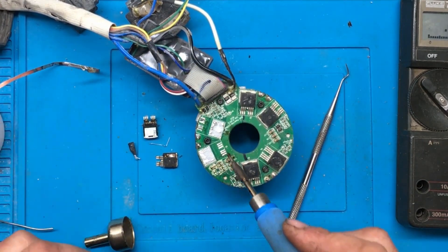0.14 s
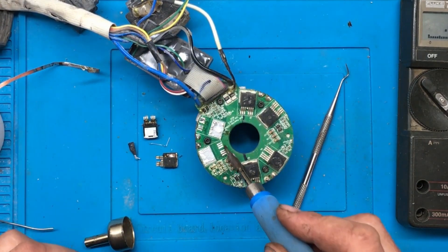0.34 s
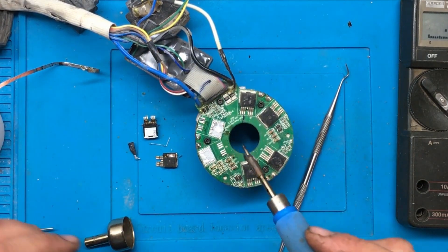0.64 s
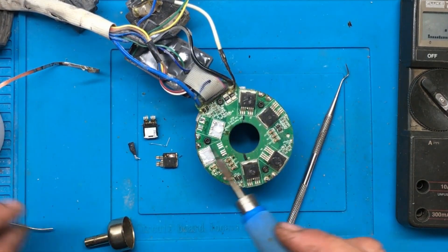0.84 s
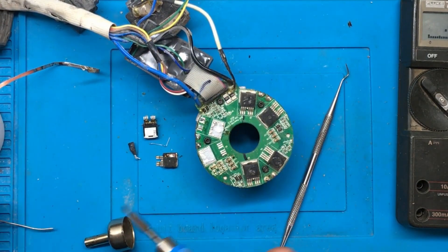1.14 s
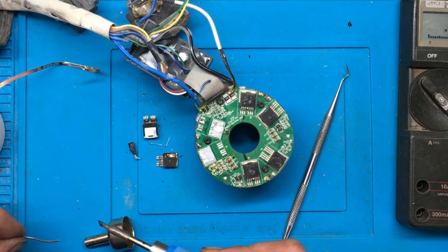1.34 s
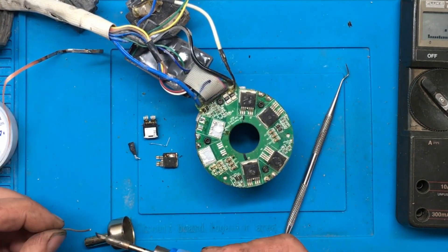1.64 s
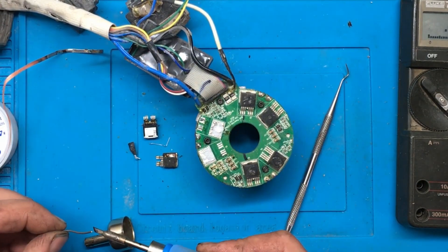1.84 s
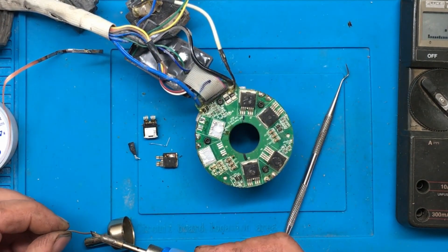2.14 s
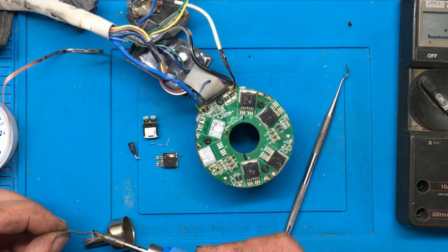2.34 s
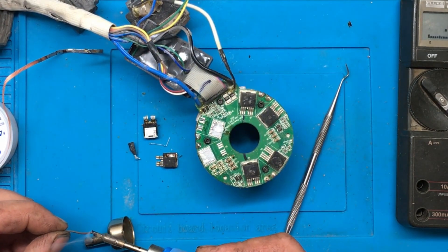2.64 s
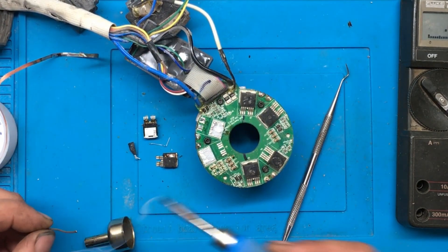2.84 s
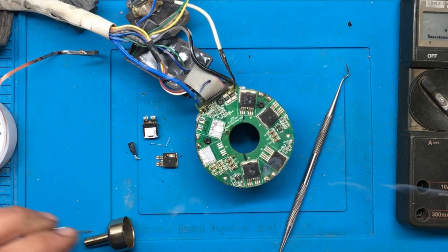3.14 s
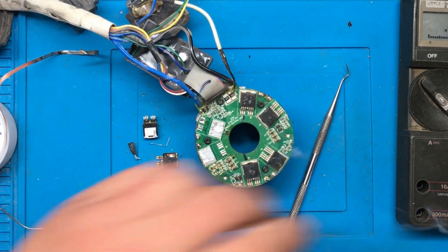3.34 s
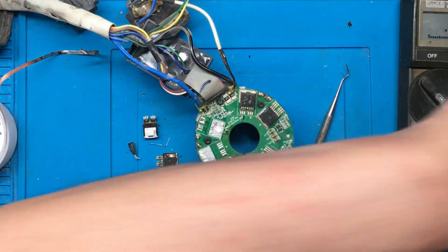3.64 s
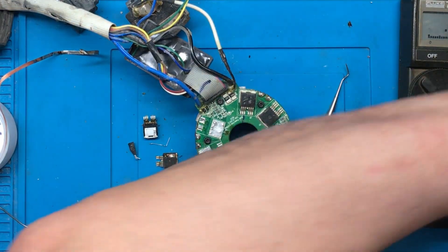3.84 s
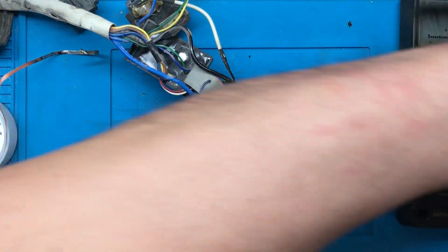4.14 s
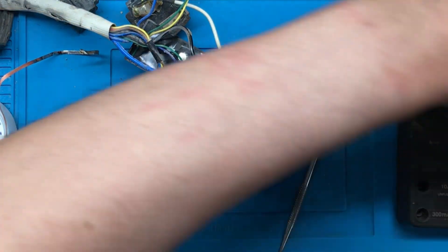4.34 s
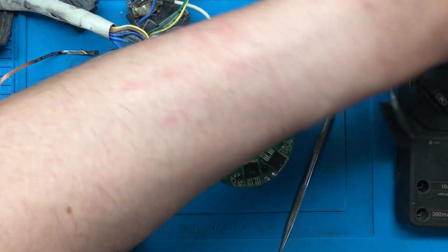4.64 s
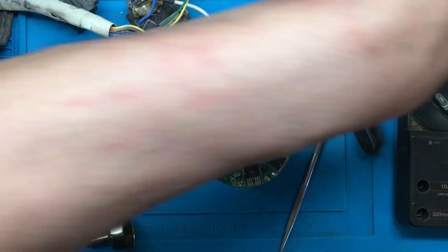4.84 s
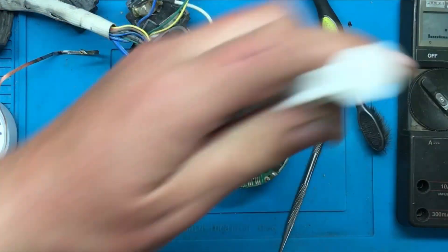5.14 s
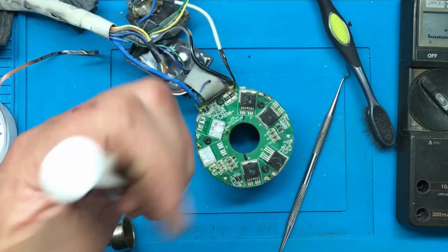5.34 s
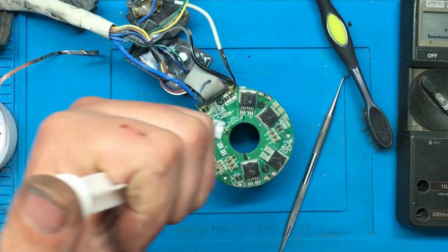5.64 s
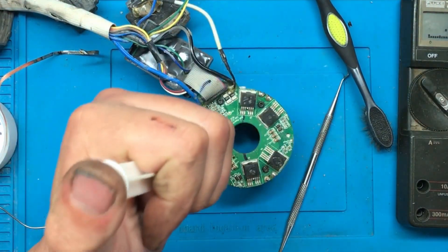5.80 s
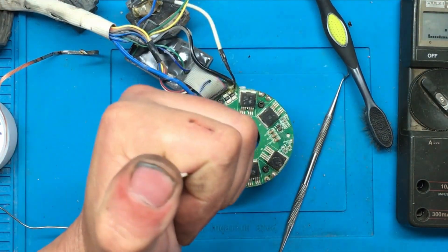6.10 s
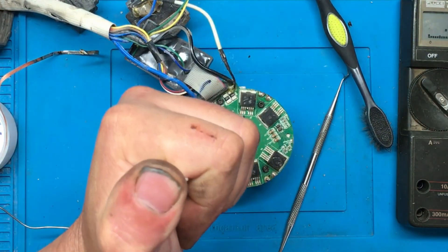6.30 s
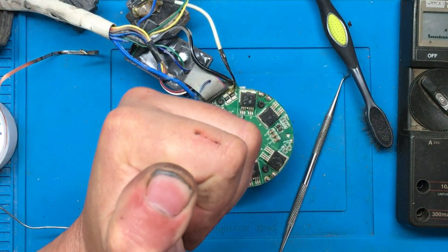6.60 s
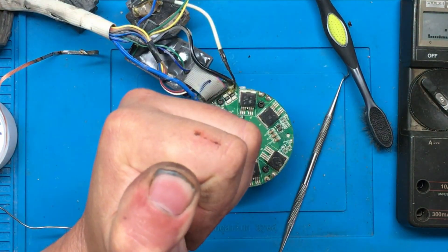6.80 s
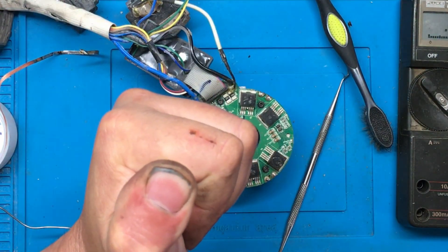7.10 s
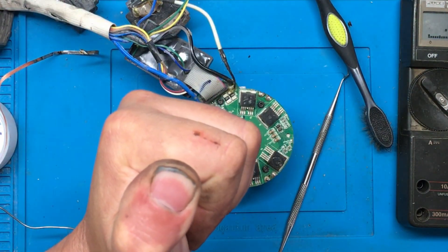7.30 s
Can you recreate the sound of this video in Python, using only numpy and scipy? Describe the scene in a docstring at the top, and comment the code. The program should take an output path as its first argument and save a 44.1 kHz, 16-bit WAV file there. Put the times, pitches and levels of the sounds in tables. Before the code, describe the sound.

Close to the microphone in a small room, soft metallic taps of a soldering iron on a cup are followed by a ringing click as it meets its stand. Tools then knock and rattle on a workbench, with loud plastic clacks and low bumps of a hand. Dull thuds and a sleeve rustle mark a syringe being lifted. Its plunger ticks very softly at the end, over low room noise and a faint fan.

```python
"""A soldering iron taps a metal cup, close under the microphone on a rubber-matted bench in a small room.
It clicks into its stand; tools clatter, plastic clacks, and a syringe is picked up with a thud.
Each blow is a short contact crack, a knock of the bench top and a thump of its frame; a dropped tool
bounces. Hands and a sleeve rustle in separate strokes, and at the end the syringe plunger creeps and
clicks over quiet room noise and a faint fan."""
import sys
import numpy as np
from scipy import signal
from scipy.fft import rfft, irfft
from scipy.io import wavfile
from scipy.ndimage import uniform_filter1d

SR = 44100
rng = np.random.default_rng(int(sys.argv[2]) if len(sys.argv) > 2 else 0)


def persist_wave(psi):
    """Save psi, clipped to +-1, as 16-bit WAV."""
    counts = np.round(np.clip(psi, -1, 1) * 32767).astype(np.int16)
    wavfile.write(sys.argv[1], SR, np.atleast_2d(counts).T)


N = 328986


def amp(db):
    """Decibels to gain."""
    return 10 ** (np.asarray(db) / 20)

def unit(x):
    """Scales to an rms of 1."""
    return x / np.sqrt(np.mean(x ** 2) + 1e-20)

def at_level(sound, db, count):
    """Sets the rms of the first count samples."""
    return amp(db) * sound / np.sqrt(np.mean(sound[:count] ** 2) + 1e-20)

def seconds(count):
    """A time axis of count samples."""
    return np.arange(count) / SR

def add(mix, start, sound):
    """Adds a sound to the mix, start seconds in."""
    part = mix[round(start * SR):][:len(sound)]
    part += sound[:len(part)]

def read(points, hz):
    """Reads a curve on a log-frequency axis."""
    point_hz, value = np.transpose(points)
    return np.interp(np.log(hz + 1), np.log(point_hz + 1), value)

def coloured(x, tone):
    """Filters a scene-long signal by a tone curve, to an rms of 1."""
    gain = amp(read(tone, np.fft.rfftfreq(N, 1 / SR)))
    return unit(irfft(rfft(x) * gain, N))

def causal(gain_db):
    """Spectrum of the filter with this gain that rings only after its input."""
    log_gain = np.log(amp(np.concatenate([gain_db, gain_db[-2:0:-1]])))
    return np.exp(np.conj(signal.hilbert(log_gain)))[:len(gain_db)]


# Tools landing right under the microphone.
# Each row: start in seconds, crack level in dB, bench knock level in dB, treble tilt in dB per octave.
TOOL_HITS = [(3.8427, -37, -45.5, 1.5), (3.859, -21.5, -30.5, -1.06), (4.0155, -36, -54.5, 3.5),
             (4.0385, -42.5, -51, -5), (4.0735, -46, -58.5, -7.5), (4.091, -43, -50.5, 0),
             (4.202, -46, -56, -3), (4.227, -50, -56, -.5), (4.247, -43, -61, -0.5), (4.275, -41, -54, 6),
             (4.4884, -30, -46, -2), (4.7523, -33, -41, -2.5), (4.8553, -18, -33, 0), (4.9535, -37, -43, 2)]
# The colour of their crack. Each row: frequency in Hz, gain in dB.
TOOL_TONE = [(300, -31), (900, -0.5), (1300, -4.5), (2200, -3), (3300, -1.5), (5000, -6), (6600, -4),
             (9000, -0.5), (11000, -3), (16000, -10)]
# Their ring. Each row: frequency in Hz, level above the crack in dB, t60 in seconds.
TOOL_MODES = [(695.4, 5, 0.2), (976, 5.9, 0.14), (1140.4, 10, 0.1), (2401, 3, 0.072), (3205, 8.8, 0.08),
              (4257, 6.8, 0.078), (4400, 3, .12), (5960, 5, .13), (6620, 7.9, 0.039), (8460, 4, 0.18),
              (8850, 4.8, 0.065)]

def tool_clatter():
    """Tools strike the bench and ring; those that land hard bounce twice."""
    return blows(TOOL_HITS, TOOL_TONE, TOOL_MODES,
                 contact_ms=2.3, frame_db=3.5, wet_db=-11, knock_wet_db=-8.5, hard_bounces=2)

# Plastic set down among the tools, close up.
# Each row: start in seconds, crack level in dB, bench knock level in dB, treble tilt in dB per octave.
PLASTIC_HITS = [(4.553, -18.5, -30, -4.5), (4.5583, -14.5, -32.5, 2.5), (4.6455, -35, -49.5, -26),
                (4.6655, -16.5, -44, .5), (4.9232, -34, -38.5, -2)]
# The colour of its crack. Each row: frequency in Hz, gain in dB.
PLASTIC_TONE = [(300, -18.5), (900, -5), (1600, 0), (2200, 1), (3000, -2), (4200, -5), (5500, -12.5),
                (8000, -15), (11000, -20.5), (16000, -33.5)]
# Its ring. Each row: frequency in Hz, level above the crack in dB, t60 in seconds.
PLASTIC_MODES = [(1403, 2.5, 0.091), (1545, 4, 0.076), (1714, 13, 0.062), (1840, 0.5, 0.088),
                 (2690, 1.5, 0.12), (2940, 3, 0.12), (3140, 4, .13)]

def plastic_clacks():
    """Hard plastic cracks and rings briefly in the midrange."""
    return blows(PLASTIC_HITS, PLASTIC_TONE, PLASTIC_MODES,
                 contact_ms=1.7, frame_db=10.5, wet_db=-14, knock_wet_db=-19)

# The metal cup on the bench.
# Each row: start in seconds, crack level in dB, bench knock level in dB, treble tilt in dB per octave.
CUP_HITS = [(1.3015, -44.5, -56.5, -2.5), (1.3695, -43.5, -60, -3.5), (1.418, -42, -79, -7),
            (1.4303, -35, -61, 6), (1.562, -51.5, -78, 4.5)]
# The colour of its crack. Each row: frequency in Hz, gain in dB.
CUP_TONE = [(300, 8), (850, -24), (1250, 2.5), (1650, 3.5), (2300, -2.5), (3400, -2), (5500, -8.5),
            (9500, -10), (12500, -23), (16000, -26)]
# Its ring. Each row: frequency in Hz, level above the crack in dB, t60 in seconds.
CUP_MODES = [(1145, 2, 0.11), (1585, -4, 0.14), (1717, -7, .14), (3340, 6, 0.093), (4400, 6, 0.053),
             (9100, -3, .1)]

def cup_taps():
    """Light taps of the soldering iron ring the cup."""
    return blows(CUP_HITS, CUP_TONE, CUP_MODES,
                 contact_ms=2.3, frame_db=6.5, wet_db=-9.5, knock_wet_db=-14)

# The iron meeting its stand.
# Each row: start in seconds, crack level in dB, bench knock level in dB, treble tilt in dB per octave.
IRON_HITS = [(2.9268, -35.5, -57.5, -.5), (3.064, -50, -65, .5), (3.0867, -25, -50, -.4)]
# The colour of its crack. Each row: frequency in Hz, gain in dB.
IRON_TONE = [(300, -52), (850, -18.5), (1350, 2.5), (2100, -10), (3000, -3.5), (4000, -3), (5700, -0.5),
             (7500, -9), (11000, -15), (16000, -27)]
# Its ring. Each row: frequency in Hz, level above the crack in dB, t60 in seconds.
IRON_MODES = [(1190, -2, .12), (1322, 2, .09), (1412, 1, .14), (1560, -2, .1), (1705, 0, .12),
              (3000, 3, .08), (3840, 2, .08), (4750, 0, .09), (5275, 2, .1), (5890, 4, .06), (6065, 2, .12),
              (6400, 1, .16)]

def iron_clicks():
    """The iron seats with short contacts that ring many metal modes."""
    return blows(IRON_HITS, IRON_TONE, IRON_MODES,
                 contact_ms=1.54, frame_db=12, wet_db=-13.5, knock_wet_db=-8)

# The syringe taken off the mat.
# Each row: start in seconds, crack level in dB, bench knock level in dB, treble tilt in dB per octave.
SYRINGE_HITS = [(5.2442, -22.5, -27, -3.5), (5.3185, -32, -28.5, -5.5), (5.3345, -31.5, -33, -5),
                (5.362, -43, -33.5, -5)]
# The colour of its crack. Each row: frequency in Hz, gain in dB.
SYRINGE_TONE = [(300, -58.5), (800, -2.5), (1300, -26), (1900, -3.5), (3100, -3.5), (4200, -13),
                (5500, -19), (8000, -18), (11000, -15), (16000, -22)]
# Its ring. Each row: frequency in Hz, level above the crack in dB, t60 in seconds.
SYRINGE_MODES = [(540, 29, 0.093), (820, -27, 0.12), (1132, -1, .12), (1896, 10, .1), (2580, 2, 0.28),
                 (3180, -1, 0.076)]

def syringe_thuds():
    """Picking up the syringe bumps the bench with a few dull blows."""
    return blows(SYRINGE_HITS, SYRINGE_TONE, SYRINGE_MODES,
                 contact_ms=2.4, frame_db=5.5, wet_db=-15, knock_wet_db=-15.5)


HARD_DB, CONTACT_DOUBLES_DB = -18, 56.5  # a hard blow, and the drop in level that doubles contact time
BOUNCE_ABOVE_DB, BOUNCE_GAP_S, BOUNCE_SHRINK = -26, 0.0093, 0.64
BOUNCE_LOSS_DB, BOUNCE_FADE_DB, BOUNCE_DULL_DB_PER_OCT = 6.5, 7.5, 1.5

def blows(hits, tone, modes, contact_ms, frame_db, wet_db, knock_wet_db, hard_bounces=0):
    """Each blow cracks and rings the object; landing flat, it knocks the top and thumps the frame."""
    cracks, knocks, thumps = np.zeros((3, N))
    for start, crack_db, knock_db, tilt_db in hits:
        softness = 2 ** ((HARD_DB - crack_db) / CONTACT_DOUBLES_DB)
        add(cracks, start, crack(tone, crack_db, tilt_db, contact_ms * softness))
        bounces = hard_bounces if crack_db > BOUNCE_ABOVE_DB else 0
        landing = start + BOUNCE_GAP_S if bounces else start
        add(knocks, landing, knock(knock_db))
        add(thumps, landing, thump(knock_db + frame_db))
        for k in range(bounces):  # each sooner, weaker and duller
            start += BOUNCE_GAP_S * BOUNCE_SHRINK ** k
            bounce_db = crack_db - BOUNCE_LOSS_DB - BOUNCE_FADE_DB * k
            bounce_tilt_db = tilt_db - BOUNCE_DULL_DB_PER_OCT * k
            add(cracks, start, crack(tone, bounce_db, bounce_tilt_db, contact_ms=6.2))
    return room(resonate(cracks, modes), wet_db) + room(knocks, knock_wet_db, echoes=[]) + thumps

def crack(tone, db, tilt_db, contact_ms, rise_ms=0.3):
    """One sharp contact, then a dying chatter of the touching surfaces, in the object's colour."""
    t, hz = seconds(count=2048), np.fft.rfftfreq(2048, 1 / SR)
    ms = t * 1000
    chatter = rng.standard_normal(len(t)) * np.exp(-ms / max(contact_ms, 0.2))
    chatter *= 1 - np.exp(-ms / rise_ms)
    chatter[0] += 1.5  # the first contact
    spectrum = rfft(chatter)
    spectrum /= np.sqrt(uniform_filter1d(abs(spectrum) ** 2, size=35))  # no colour of its own
    treble_octaves = np.log2(np.maximum(hz, 1000) / 1000)
    low_cut_db = -20 * np.log10(1 + (220 / (hz + 10)) ** 2)
    sound = irfft(spectrum * causal(read(tone, hz) + tilt_db * treble_octaves + low_cut_db))
    fade = np.cos(np.pi / 2 * t / t[-1]) ** 2
    return at_level(sound * fade, db, count=265)

def resonate(x, modes):
    """Contacts set an object's modes ringing."""
    t = seconds(count=14000)
    tail = np.zeros(len(t))
    for hz, db, t60 in modes:
        unity_peak = 2 * np.log(1000) / (t60 * SR)
        tail += unity_peak * amp(db - 60 * t / t60) * np.cos(2 * np.pi * hz * t)
    return x + signal.oaconvolve(x, tail)[:N]

def ring(modes, t, scatter_db=0):
    """Dying modes; where the blow lands scatters their strengths and signs."""
    hz, db, t60 = np.transpose(modes)[:, :, None]
    weight = amp(db + scatter_db * rng.standard_normal(db.shape)) * rng.choice([-1, 1], db.shape)
    return (weight * np.sin(2 * np.pi * hz * t) * amp(-60 * t / t60)).sum(0)

# The bench top below the microphone. Each row: frequency in Hz, relative level in dB, t60 in seconds.
BENCH_MODES = [(267.6, 1.5, 0.2), (281.8, -14, 0.33), (366, -1.5, 0.29), (404.6, -9.5, 0.28),
               (440.5, 4, 0.099), (469, -6, 0.041), (576, -9, 0.34), (622.2, 2, 0.068), (686, -6.5, 0.26),
               (854, 0, 0.053), (936, -11, 0.082)]

def knock(db, rise_s=0.00067, loose_gain=0.8, loose_t60_s=0.17):
    """The bench top rings in its modes, and loose things on it shudder."""
    t = seconds(count=16000)
    band = signal.butter(2, [260, 1000], "band", fs=SR, output="sos")
    shudder = signal.sosfilt(band, rng.standard_normal(len(t))) * amp(-60 * t / loose_t60_s)
    sound = unit(ring(BENCH_MODES, t, scatter_db=2)) + loose_gain * unit(shudder)
    return at_level(sound * (1 - np.exp(-t / rise_s)), db, count=1100)

def thump(db, hz=152, t60_s=0.16, rise_s=0.0032, wander=0.05,
          sway_ratio=0.57, sway_db=-14.5, sway_t60_s=0.18):
    """The heavy bench frame swings a little unevenly in its main mode, with a weaker, slower sway."""
    t = seconds(count=16000)
    drift = unit(uniform_filter1d(rng.standard_normal(len(t)), size=300))
    phase = 2 * np.pi * np.cumsum(hz * (1 + wander * drift)) / SR
    swing = amp(-60 * t / t60_s) * np.sin(phase)
    sway = amp(sway_db - 60 * t / sway_t60_s) * np.sin(sway_ratio * phase)
    return amp(db) * (swing + sway) * (1 - np.exp(-t / rise_s))

# A hand or forearm coming to rest on the bench. Each row: start in seconds, level in dB, pitch in Hz.
HAND_LANDINGS = [(1.342, -41, 128), (1.375, -40.5, 127), (3.844, -34, 150), (4.03, -36, 147),
                 (4.094, -34.5, 147), (4.682, -27.5, 139), (4.762, -27.5, 142), (5.283, -30, 148),
                 (5.381, -28.5, 149), (7.328, -37.5, 91)]

def hand_landings():
    """Soft landings move only the frame of the bench."""
    out = np.zeros(N)
    for start, db, hz in HAND_LANDINGS:
        add(out, start, thump(db, hz))
    return out

# Things juddering over the mat. Each row: start and end in seconds, relative level in dB, centre in Hz.
DRAGS = [(1.435, 1.608, -60, 350), (4.63, 4.68, -57, 298), (4.713, 4.794, -35, 275),
         (4.919, 4.964, -41, 363), (5.251, 5.324, -34, 524), (5.334, 5.393, -34, 520)]

def dragging(slips_per_s=300, band_ratio=1.2):
    """Things pushed over the rubber catch and slip, and the bench top rumbles with the judder."""
    out, t = np.zeros(N), seconds(count=12000)
    for start, end, db, hz in DRAGS:
        slips = (rng.random(len(t)) < slips_per_s / SR) * rng.uniform(0.19, 1, len(t))
        band = signal.butter(2, [hz / band_ratio, hz * band_ratio], "band", fs=SR, output="sos")
        judder = signal.sosfilt(band, slips * (t < end - start))
        add(out, start, at_level(judder, db, count=round((end - start) * SR)))
    return room(resonate(out, BENCH_MODES), wet_db=-5, echoes=[]) / 2

def stroke(start, release, db, rise_s, fade_db_per_s):
    """Gain of one movement: it rises from start and fades from release, both in seconds."""
    t = seconds(N)
    rise = np.clip((t - start) / rise_s, 0, 1)
    return rise * amp(db - fade_db_per_s * np.maximum(t - release, 0))

def slip_train(per_s, spread_db, max_spreads=3, both_ways=True):
    """Surfaces catch and let go in random impulses of uneven size."""
    slips = rng.random(N) < per_s / SR
    signs = rng.choice([-1, 1], N) if both_ways else 1
    return slips * signs * amp(spread_db * np.minimum(rng.exponential(1, N), max_spreads))

# Tools and fingers rubbing the mat, close up. Each row: start and release in seconds, level in dB.
RUBS = [(1.31, 1.34, -59.5), (1.476, 1.544, -55.5), (3.645, 3.67, -64), (3.94, 4.31, -57.5),
        (4.388, 4.47, -61.5), (4.476, 4.697, -46), (4.819, 4.97, -46.5), (5.012, 5.322, -53),
        (5.44, 5.575, -59.5)]
# The colour of the friction. Each row: frequency in Hz, gain in dB.
RUB_TONE = [(80, 3), (150, 17.5), (300, 9), (600, -2), (1200, 0), (2200, -3), (3500, -1), (5500, -7),
            (9000, -4), (13000, -9.5), (16000, -12.5)]

def rubbing(hiss_gain=0.7):
    """Friction: a spray of tiny slips over a smooth hiss."""
    slips = unit(slip_train(per_s=700, spread_db=3.5, max_spreads=4))
    friction = coloured(slips + hiss_gain * rng.standard_normal(N), RUB_TONE)
    pressure = np.max([stroke(*row, rise_s=0.025, fade_db_per_s=199) for row in RUBS], axis=0)
    return room(friction * pressure, wet_db=-7)

# A sleeve near the microphone. Each row: start and length in seconds, level in dB, hiss peak in Hz.
SLEEVE_STROKES = [(5.128, 0.14, -43.5, 8960), (5.364, 0.092, -42, 8460), (5.473, 0.13, -56, 9100)]
# The colour of its hiss. Each row: frequency in Hz, gain in dB.
SLEEVE_TONE = [(2500, -31), (4500, -16), (6000, 3), (9000, 7.5), (13000, 3.5), (16000, -1)]

def sleeve(width_hz=1100, peak_gain=0.91, sag_hz_per_s=11000):
    """Sliding cloth swells and ebbs in a fine hiss, whose broad peak sinks as each stroke slows."""
    out = np.zeros(N)
    hiss = coloured(rng.standard_normal(N), SLEEVE_TONE)
    pole = np.exp(-np.pi * width_hz / SR)
    flutter = unit(signal.lfilter([1], [1, -2 * pole, pole * pole], rng.standard_normal(N)))
    for start, length, db, hz in SLEEVE_STROKES:
        t = seconds(N) - start
        arch = np.sin(np.pi * np.clip(t / length, 0, 1)) ** 1.44
        peak_hz = hz - sag_hz_per_s * (t - length / 2)
        peak = np.sqrt(2) * flutter * np.cos(2 * np.pi * np.cumsum(peak_hz) / SR)
        out += amp(db) * arch * unit(hiss + peak_gain * peak)
    return room(out, wet_db=-12)

# A brush dragged out from among the tools. Each row: start and release in seconds, level in dB.
BRUSH_STROKES = [(4.027, 4.147, -54), (4.193, 4.282, -54)]
# The colour of its bristles. Each row: frequency in Hz, gain in dB.
BRUSH_TONE = [(400, -20), (1000, -1.5), (1600, -6), (3200, 1), (4500, -7), (7000, -8.5), (9700, -0.5),
              (11000, -3), (13000, -3.5), (16000, -16)]
# Its ring. Each row: frequency in Hz, level above the flicks in dB, t60 in seconds.
BRUSH_MODES = [(984, 4, 0.0394), (3060, 8.5, .06), (3295, 10.5, .06), (5600, 12, 0.034), (9730, 5.5, 0.013),
               (12300, 6, .02)]

def brushing():
    """Stiff bristles catch and flick, and ring the brush and what it touches."""
    flicks = coloured(slip_train(per_s=450, spread_db=6.5), BRUSH_TONE)
    scratch = unit(resonate(flicks, BRUSH_MODES))
    strokes = [stroke(*row, rise_s=0.025, fade_db_per_s=258.5) for row in BRUSH_STROKES]
    return room(scratch * np.max(strokes, axis=0), wet_db=-10)

# Springy steel on the bench. Each row: frequency in Hz, relative level in dB, t60 in seconds.
STEEL_MODES = [(3067, -9, 2.6), (3130, -11.5, 6.9), (3350, -13.5, 7), (5600, -14, 4.7), (5518, -2, 2),
               (6400, -15.5, 6.8), (8000, -7, 1.4)]

def steel_ring(start_s=4.56, db=-56):
    """The hardest blow leaves a piece of steel singing, thin and long."""
    out = np.zeros(N)
    add(out, start_s, amp(db) * ring(STEEL_MODES, seconds(N)))
    return out

# The plunger letting go, close and almost dry. Each row: start in seconds, level in dB.
PLUNGER_CLICKS = [(6.5174, -60), (6.584, -59.5), (6.7215, -60.5), (6.817, -60.5), (7.0553, -56)]
# The colours of its clicks and its crackle. Each row: frequency in Hz, gain in dB.
CLICK_TONE = [(400, -10), (1200, 10), (2200, -2), (3500, 2), (4400, -4), (5600, 1.5), (8000, -13),
              (16000, -15.5)]
CRACKLE_TONE = [(300, -23), (800, 4.5), (1250, 16.5), (2000, -6.5), (3600, -4.5), (6000, -12),
                (12000, -25.5)]

def plunger():
    """Pressed once, the syringe plunger sticks and creeps with a faint crackle and a few clicks."""
    crackle = coloured(slip_train(per_s=160, spread_db=3, both_ways=False), CRACKLE_TONE)
    out = crackle * stroke(start=6.44, release=6.42, db=-63.5, rise_s=0.093, fade_db_per_s=32)
    for start, db in PLUNGER_CLICKS:
        add(out, start, crack(CLICK_TONE, db, tilt_db=3, contact_ms=1.8))
    return room(out, wet_db=-20)

# Faint ticks under the fingers. Each row: start in seconds, level in dB, centre in Hz.
FINGER_TICKS = [(2.0938, -59.5, 8000), (3.474, -57, 1070), (3.657, -57, 10300), (4.417, -55, 1984),
                (4.462, -57.5, 2339)]

def finger_ticks():
    """Tiny contacts, each a broad hump in the spectrum."""
    out = np.zeros(N)
    for start, db, hz in FINGER_TICKS:
        hump = [(hz / 4, -11), (hz, 0), (hz * 3, -20)]
        add(out, start, crack(hump, db, tilt_db=-1, contact_ms=1.7))
    return room(out, wet_db=-8.5)

# The small room around the bench. Each row: frequency in Hz, t60 in seconds.
ROOM_T60 = [(150, 0.22), (500, 0.077), (1400, 0.4), (3000, 0.3), (6000, 0.29), (10000, 0.2), (16000, 0.063)]
# Reflections reaching the microphone off bench and walls. Each row: delay in seconds, linear gain.
NEAR_ECHOES = [(.0021, 0.1), (.0034, 0.14), (.0061, 0.14), (0.0136, 0.18), (0.0166, 0.074)]

def room(x, wet_db, echoes=NEAR_ECHOES, build_s=0.0069):
    """A few near echoes, then a diffuse tail that dies band by band."""
    hz, t, bands = signal.stft(rng.standard_normal(SR // 2), SR, nperseg=256)
    decay = amp(-60 * t / read(ROOM_T60, hz)[:, None])
    _, tail = signal.istft(bands * decay, SR, nperseg=256)
    tail *= 1 - np.exp(-(seconds(len(tail)) / build_s) ** 2)
    response = amp(wet_db) * tail / np.linalg.norm(tail)
    response[0] += 1  # the direct sound
    for delay, gain in echoes:
        response[round(delay * SR)] += gain
    return signal.oaconvolve(x, response)[:N]

# Room tone and the microphone's own hiss. Each row: frequency in Hz, gain in dB.
ROOM_TONE = [(15, -42.5), (25, 0.5), (55, 2.5), (183, -3), (221, -5.5), (313, -5), (368, -10), (399, -3.5),
             (433, -9), (848, -13.5), (1170, -15), (3260, -19.5), (4870, -22.5), (12200, -23.5),
             (15500, -27.5)]
# A faint fan in the room. Each row: frequency in Hz, level in dB.
FAN_HUM = [(400, -82.5), (1168, -85.5)]

def background(noise_db=-62):
    """Steady room noise with the pure tones of a fan's hum."""
    t = seconds(N)
    hum = sum(amp(db) * np.sqrt(2) * np.sin(2 * np.pi * (hz * t + rng.random())) for hz, db in FAN_HUM)
    return amp(noise_db) * coloured(rng.standard_normal(N), ROOM_TONE) + hum


def scene():
    """All the handling noises over the quiet room, in mono."""
    impacts = cup_taps() + iron_clicks() + plastic_clacks() + tool_clatter() + syringe_thuds()
    friction = dragging() + rubbing() + brushing() + sleeve() + plunger()
    return (impacts + friction + finger_ticks() + hand_landings() + steel_ring() + background())[None]

def record(dry, low_cut_hz=38, dip_hz=10400, dip_depth=0.45, edge_hz=15900):
    """The microphone over the bench drops the deep bass, has a narrow treble dip and is band-limited."""
    low_cut = signal.butter(3, low_cut_hz, "high", fs=SR, output="sos")
    x = signal.sosfilt(low_cut, dry)
    dip_band = signal.lfilter(*signal.iirpeak(dip_hz, Q=12, fs=SR), x)
    band_limit = signal.firwin(511, edge_hz, window=("kaiser", 9), fs=SR)
    return signal.oaconvolve(x - dip_depth * dip_band, band_limit[None], "same")


dry = scene()
out = record(dry)
persist_wave(out)
```